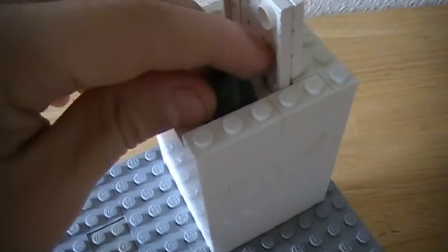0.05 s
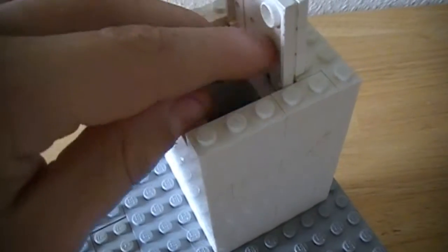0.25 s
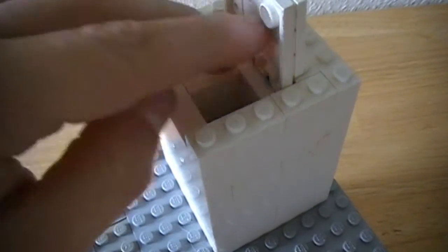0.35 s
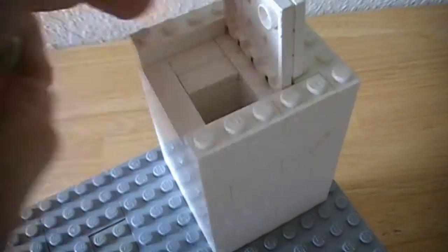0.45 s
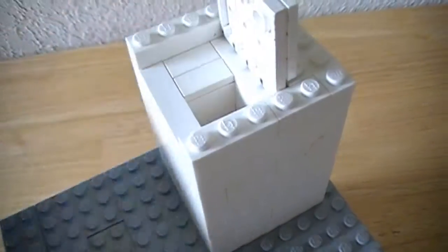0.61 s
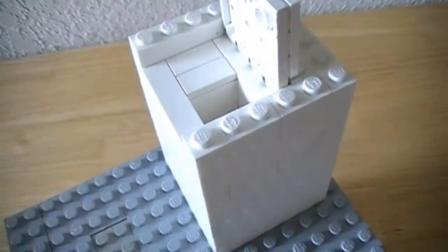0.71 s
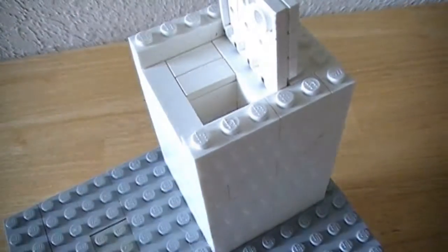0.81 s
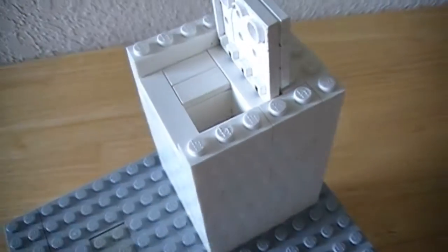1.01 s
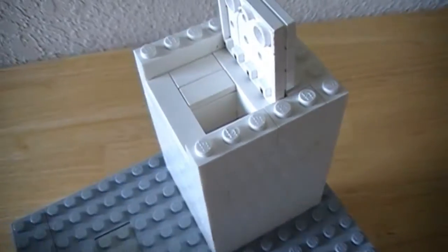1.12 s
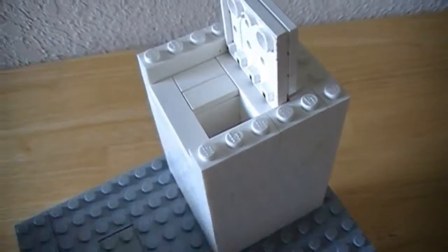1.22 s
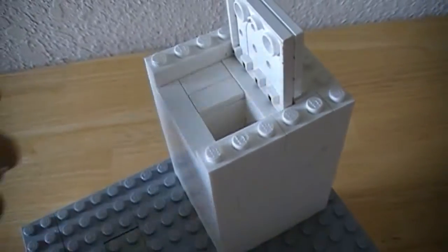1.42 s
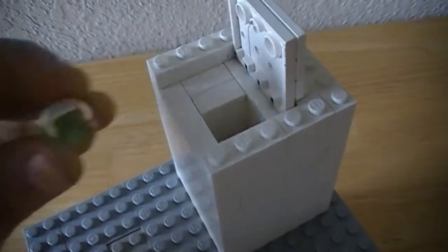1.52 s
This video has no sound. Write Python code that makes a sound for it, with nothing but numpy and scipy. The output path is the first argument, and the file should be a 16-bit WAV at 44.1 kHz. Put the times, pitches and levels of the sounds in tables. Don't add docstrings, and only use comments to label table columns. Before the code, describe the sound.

Close up in a quiet indoor room, a small hard coin ticks and scrapes down a plastic shaft, snaps on an edge, rattles briefly at the bottom, then only faint hiss, hum and soft hand rustle remain.

```python
import sys
import numpy as np
from scipy import signal
from scipy.fft import rfft, irfft, next_fast_len
from scipy.io import wavfile
from scipy.ndimage import uniform_filter1d, map_coordinates

SR = 44100
rng = np.random.default_rng(int(sys.argv[2]) if len(sys.argv) > 2 else 0)


def attenuation_scalar(level_db):
    decades = np.asarray(level_db, float) / 20
    return 10 ** decades


def generate_wav(sig):
    pcm = np.round(np.clip(np.atleast_2d(sig).T, -1, 1) * 32767).astype(np.int16)
    wavfile.write(sys.argv[1], SR, pcm)


N = 68355
RING_TIME = np.arange(SR // 8) / SR
LEFT_DB = 0.67

# (time [s], peak [dB], brick ring [Hz], crack [dB], box air [dB])
BOTTOM_HITS = [(0.4218, -13, 1770, -11.5, -13.5), (.4255, -16.5, 980, -16, -28.5),
               (0.4384, -24, 1900, -12.5, -11), (.454, -12.5, 1350, -6, -14.5),
               (.47, -7.5, 2857, -13.5, -18.5), (.481, -19, 1290, -7, -17.5),
               (0.493, -25, 2140, -3.5, -7.5), (.514, -9.5, 2760, -16.5, -17), (.538, -39.5, 2320, 1, -4.5),
               (.546, -10.5, 2650, -13, -20.5), (.567, -14, 2650, -13.5, -17.5),
               (.581, -20.5, 2650, -14.5, -20), (.591, -28, 1290, -17, -17.5)]
# (frequency [Hz], level [dB], 60 dB decay time [s])
BOX_AIR = [(377.4, -8.5, 0.039), (473, -9.5, 0.05), (600, -3, 0.045), (631.5, -0.5, 0.055),
           (669, -1, 0.055), (750, -5.5, 0.026), (893, -3.5, 0.033)]
# (frequency [Hz], level [dB], 60 dB decay time [s])
WALL_MODES = [(994, 1, 0.038), (1170, 3, 0.025), (1228, -6.5, 0.075), (1371, -1, 0.051), (1662, 0.5, 0.045),
              (1900, -1.5, 0.071), (2140, 1, 0.038), (2650, -4.5, 0.028), (2760, -16, 0.05),
              (3260, 5.5, 0.023), (3900, -13, 0.058), (4710, -12.5, 0.018)]
# (frequency [Hz], level [dB], 60 dB decay time [s])
BASE_MODES = [(844, -5, 0.026), (1012, -6.5, 0.035), (1195, -3, 0.023), (1273, -4.5, 0.059),
              (1405, 8.5, 0.0068), (1976, -1, 0.028), (2140, 0.5, 0.018), (2650, -4.5, 0.036),
              (2720, -12, 0.019), (3120, -8.5, 0.026), (4020, -22.5, 0.095), (4970, -10.5, 0.019)]


def unit(x):
    return x / np.sqrt(np.mean(x ** 2) + 1e-20)


def along(points, hz):
    f, v = np.transpose(points)
    return np.interp(np.log(hz + 1), np.log(f + 1), v)


def filtered(x, response):
    n = x.shape[-1]
    m = next_fast_len(n + 8192)
    spectrum = rfft(x, m) * response(np.fft.rfftfreq(m, 1 / SR))
    return irfft(spectrum, m)[..., :n]


def left_right(db):
    return attenuation_scalar(np.array([[db], [-db]]))


def ring(modes, t, push, scatter_db=3):
    hz, db, t60 = np.transpose(modes)[:, :, None]
    level_chance, pitch_chance = rng.standard_normal((2, len(modes), 1))
    fade = attenuation_scalar(db + scatter_db * level_chance - 60 * t / np.abs(t60))
    tones = fade * np.sin(2 * np.pi * hz * (1 + .011 * pitch_chance) * t)
    sign = (-1) ** np.arange(len(modes))[:, None]
    y = signal.fftconvolve((sign * tones).sum(axis=0), push)[:len(t)]
    return y / np.abs(y).max()


def room(x):
    # (frequency [Hz], 60 dB decay time [s])
    room_decay = [(200, 0.13), (600, 0.48), (1500, 0.49), (4000, 0.41), (10000, 0.54)]
    # (frequency [Hz], level [dB])
    room_colour = [(500, 3.5), (2500, -1.5), (5000, -4), (9000, -9)]
    alike = 0.77
    noise = rng.standard_normal((2, SR * 3 // 8))
    hz, t, z = signal.stft(noise, SR, nperseg=256)
    fading = z * attenuation_scalar(-60 * t / along(room_decay, hz)[:, None])
    a, b = signal.istft(fading, SR, nperseg=256)[1]
    turn = np.arccos(alike) / 2
    mid, side = np.cos(turn) * a, np.sin(turn) * b
    tail = np.array([mid + side, mid - side]) / np.linalg.norm(a)
    x = filtered(x, lambda f: attenuation_scalar(along(room_colour, f)))
    late = np.pad(x, (200, 0))
    return signal.fftconvolve(late[None], tail, axes=1)


def add(out, s, x):
    low_cut_hz, room_db = 302, -13
    low_cut = signal.butter(3, low_cut_hz, "high", fs=SR, output="sos")
    x = signal.sosfilt(low_cut, x * np.ones((2, 1)))
    i = round(s * SR)
    wet = attenuation_scalar(room_db) * room(x.mean(axis=0))[:, :SR // 2]
    out[:, i:i + x.shape[1]] += x * left_right(LEFT_DB / 2)
    out[:, i:i + wet.shape[1]] += wet


def floor():
    # (frequency [Hz], level [dB per Hz])
    hush_colour = [(40, -18.5), (90, -12.5), (130, 2), (230, -2), (400, -9.5), (900, -14), (8500, -30.5),
                   (10600, -36), (11900, -44.5), (12300, -69)]
    # (frequency [Hz], likeness [-1 to 1])
    hush_alike = [(60, 0.91), (230, 0.8), (870, -0.25), (3320, -0.014), (12600, 0.16)]
    hush_db = -57.5
    hum_hz, hum_db, hum_wobble_db, hum_left_lag_s = 120, -61, 0.6, .00023
    z = signal.stft(rng.standard_normal((2, N)), nperseg=512)[2]
    patches = uniform_filter1d(rng.standard_normal(z.shape[1:]), size=6, axis=0)
    patches = uniform_filter1d(patches, size=8, axis=1)
    pair = signal.istft(z * attenuation_scalar(1.2 * unit(patches)), nperseg=512)[1][:, :N]

    def mid_side_gain(f):
        turn = np.arccos(np.clip(along(hush_alike, f), -1, 1)) / 2
        return attenuation_scalar(along(hush_colour, f)) * np.array([np.cos(turn), np.sin(turn)])

    mid, side = filtered(pair, mid_side_gain)
    hush = attenuation_scalar(hush_db) * unit(np.array([mid + side, mid - side]))
    t = np.arange(N) / SR
    sway = map_coordinates(rng.standard_normal(20), [8 * t])
    hum_time = t - np.array([[hum_left_lag_s], [0]])
    hum = attenuation_scalar(hum_db + hum_wobble_db * sway) * np.sqrt(2) * np.sin(2 * np.pi * hum_hz * hum_time)
    return (hush + hum) * left_right(LEFT_DB / 2)


def rustle():
    # (time [s], half length [s], centre frequency [Hz], level [dB])
    rustles = [(0.843, .025, 3550, -71.5), (0.909, 0.019, 3210, -69), (0.993, 0.034, 6930, -73.5),
               (1.083, 0.024, 3460, -73), (1.1, .03, 8070, -73), (1.135, 0.019, 4500, -73),
               (1.244, 0.023, 6850, -73.5), (1.289, 0.015, 7550, -68), (1.289, 0.019, 6140, -71.5),
               (1.39, 0.018, 4540, -70.5), (1.472, 0.024, 6530, -71), (0.136, 0.32, 7980, -69.5)]
    width = .13
    out, t = np.zeros((2, N)), np.arange(N) / SR
    for s, half, hz, db in rustles:
        noise = rng.standard_normal((2, N))
        band = filtered(noise, lambda f: np.exp(-(np.log((f + 1) / hz) / width) ** 2))
        out += attenuation_scalar(db) * np.exp(-((t - s) / half) ** 4) * unit(band)
    return out


def thuds(out):
    # (frequency [Hz], level [dB], 60 dB decay time [s])
    table_modes = [(60.6, -5, 0.084), (194, 8, 0.23)]
    thud_db = -37
    for s, db, *_ in BOTTOM_HITS:
        thud = ring(table_modes, RING_TIME, np.hanning(88))
        out[:, round(s * SR):][:, :len(RING_TIME)] += attenuation_scalar(db + thud_db) * thud


def knocks(out):
    # (time [s], peak [dB])
    touches = [(0.0, -44), (.598, -35), (.607, -36), (.783, -43), (.797, -59)]
    damped_t60 = .07
    push = np.exp(-((RING_TIME - .001) / 0.00027) ** 2)
    for s, db in touches:
        body = ring(BOX_AIR + BASE_MODES[:5], RING_TIME, push)
        add(out, s, attenuation_scalar(db) * attenuation_scalar(-60 * RING_TIME / damped_t60) * body)


def rattle():
    # (time [s], level [dB])
    rattle_level = [(.2, -46.5), (.27, -55), (.335, -26.5), (.36, -52), (.42, -35), (.47, -38),
                    (.58, -34.5), (.612, -47), (.66, -68)]
    taps_per_s, air_db, stretch_s = 400, 0, .04
    out, t = np.zeros((2, N + SR)), RING_TIME
    for s in np.arange(.2, .68, stretch_s):
        chance = rng.random((2, len(t)))
        level_db = np.interp(s + t, *np.transpose(rattle_level))
        taps = (chance[0] < taps_per_s / SR) * np.log(chance[1] + 1e-9) * (t < stretch_s)
        taps = taps * attenuation_scalar(level_db - level_db.max())
        taps = np.convolve(taps, np.hanning(7))
        modes = WALL_MODES if s < .4 else BASE_MODES
        body = ring(modes, t, taps) + attenuation_scalar(air_db) * ring(BOX_AIR, t, taps)
        add(out, s, attenuation_scalar(level_db[t < stretch_s].mean() + 10) * body)
    return out[:, :N]


def panels(out):
    # (time [s], peak [dB], frequency [Hz], 60 dB decay time [s])
    panel_rings = [(.082, -45.5, 1086, 0.049), (.204, -37, 386, .06), (.3445, -26, 900, 0.033),
                   (0.4571, -20.5, 1237, 0.04), (0.4719, -23.5, 1333, .03), (0.5148, -28, 1370, 0.031),
                   (0.5468, -28, 1285, 0.023), (.569, -31, 1239, 0.08), (.676, -52.5, 643, .07),
                   (.083, -41, 600, 0.056), (0.371, -15, 3228, 0.013), (0.4715, -16, 2780, .012),
                   (0.5166, -17, 2880, 0.0087), (0.5473, -17.5, 2290, 0.0087), (.5686, -19.5, 2125, 0.0093)]
    for s, db, hz, t60 in panel_rings:
        modes = [(hz, 0, t60), (1.3 * hz, -4, t60)]
        add(out, s, attenuation_scalar(db) * ring(modes, RING_TIME, np.hanning(8)))


def pings(out):
    # (time [s], peak [dB], frequency [Hz])
    edge_pings = [(0.203, -31, 4400), (0.2529, -31, 4000), (0.2305, -34.5, 3700), (.2308, -36, 6100),
                  (.2525, -31, 6220), (0.2517, -37, 8600), (0.2724, -29, 6300), (0.2873, -38.5, 8800),
                  (0.2972, -33, 6840), (0.317, -21, 2990), (0.326, -32.5, 8140), (0.3723, -23, 7340),
                  (0.457, -30.5, 3900), (0.546, -34, 3900), (0.59, -42, 7400), (.3715, -26.5, 1900)]
    t60 = .011
    for s, db, hz in edge_pings:
        modes = [(hz, 0, t60), (1.05 * hz, -6, t60)]
        add(out, s, attenuation_scalar(db) * ring(modes, RING_TIME, np.ones(1)))


def snap(out):
    # (frequency [Hz], level [dB], 60 dB decay time [s])
    snap_modes = [(8500, 24.5, 0.0027), (7710, -3.5, 0.016), (4940, 0, .008)]
    snap_s, snap_db, width_s, left_db = .3429, -9, .00008, 1.5
    ring_db, ring_lag_s, ring_right_db = -6, .00012, .6
    edge = ring(snap_modes, RING_TIME, np.ones(1), scatter_db=1)
    add(out, snap_s + ring_lag_s, -attenuation_scalar(ring_db) * edge * left_right(-ring_right_db))
    u = (np.arange(N) / SR - snap_s) / width_s
    out[:, :N] += attenuation_scalar(snap_db) * left_right(left_db) * np.exp(-u ** 2)


def contact(hz, crack_db, air_db, brick_db, wall_db, walls):
    # (frequency [Hz], level [dB])
    crack_colour = [(1500, 1.5), (3500, 3.5), (5200, -1.5), (6400, -3.5), (7200, -0.5), (8500, -4.5),
                    (10500, -14), (12500, -26)]
    chatter_t60, rise_s, first_tap = 0.012, 0.000966, 13
    crack_t60, crack_gain_db, crack_apart = 0.02, 4, 0.17
    patch_db = 1
    air_lag_s, air_push_s, air_gain_db = 0.0014, 0.00043, 5
    brick_t60, brick_split, brick_side_db = 0.023, 0.12, -9.5
    t = RING_TIME
    rise = 1 - np.exp(-(t / rise_s) ** 2)

    hits = rng.standard_normal(len(t)) ** 3 * (rng.random(len(t)) < .15)
    chatter = hits * attenuation_scalar(-60 * t / chatter_t60) * rise
    chatter[round(rise_s * SR)] += first_tap
    chatter = np.convolve(chatter, [.25, .5, .25])

    patches_db = patch_db * rng.standard_normal(16)

    def colour(f):
        return attenuation_scalar(along(crack_colour, f) + np.interp(f, 1000 * np.arange(16), patches_db))

    noise = filtered(rng.standard_normal((2, len(t))), colour)
    a, b = noise * attenuation_scalar(-60 * t / crack_t60) * rise
    crack = np.array([a + crack_apart * b, a - crack_apart * b]) / np.abs(a).max()

    swell = np.exp(-((t - air_lag_s) / air_push_s) ** 2)
    brick = [(hz, 0, brick_t60),
             (hz * (1 - brick_split), brick_side_db, brick_t60),
             (hz * (1 + brick_split), brick_side_db, brick_t60)]
    return (attenuation_scalar(brick_db) * ring(brick, t, chatter)
            + attenuation_scalar(wall_db) * ring(walls, t, chatter)
            + attenuation_scalar(air_db + air_gain_db) * ring(BOX_AIR, t, swell)
            + attenuation_scalar(crack_db + crack_gain_db) * crack)


def contacts(out):
    # (time [s], peak
    # [dB], brick ring [Hz], crack [dB], box air [dB])
    shaft_hits = [(0.0801, -31.5, 2797, -5.5, -16.5), (0.2021, -27.5, 4334, -9.5, -21.5),
                  (0.2302, -22, 1974, -8, -21.5), (0.251, -22, 3900, -13.5, -16),
                  (0.272, -17, 3120, -11, -23), (0.2872, -22, 1900, -21, -18.5),
                  (0.2966, -22.5, 2236, -2.5, -14.5), (0.315, -14, 2067, -12.5, -32.5),
                  (0.37, -12.5, 3330, -2.5, -18.5), (0.402, -38.5, 1990, -20.5, -7.5),
                  (.292, -27.5, 1620, -25, -13.5), (.3015, -26.5, 3100, -7.5, -23.5),
                   (.3065, -21, 3830, -11, -21), (.3195, -19, 2140, -19, -23),
                   (.3245, -21.5, 4390, -2, -30), (.329, -26.5, 3170, -28.5, -18.5),
                   (.335, -15, 1920, -18.5, -36.5), (.3398, -16.5, 2600, -9.5, -36),
                   (.3432, -14.5, 2696, -7, -15.5)]
    for s, db, hz, crack_db, air_db in shaft_hits:
        add(out, s, attenuation_scalar(db) * contact(hz, crack_db, air_db, -8, -7.5, WALL_MODES))
    for s, db, hz, crack_db, air_db in BOTTOM_HITS:
        add(out, s, attenuation_scalar(db) * contact(hz, crack_db, air_db, -8.5, -5, BASE_MODES))


def coin():
    out = np.zeros((2, N + SR))
    thuds(out)
    knocks(out)
    panels(out)
    pings(out)
    snap(out)
    contacts(out)
    return out[:, :N]


def scene():
    return floor() + rustle() + rattle() + coin()


def low_pass(x):
    return signal.sosfilt(signal.butter(12, 13250, fs=SR, output="sos"), x)


def record(dry):
    # (frequency [Hz], level [dB])
    mic_tone = [(20, 2.5), (10000, -2), (11500, -2), (12500, -12), (13200, -36)]
    top_hz = 13250
    mix = filtered(dry, lambda f: attenuation_scalar(along(mic_tone, f)) * (f < top_hz))
    return low_pass(mix)


dry = scene()
out = record(dry)
generate_wav(out)
```